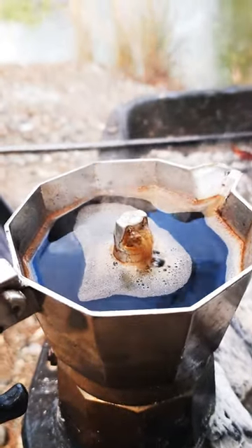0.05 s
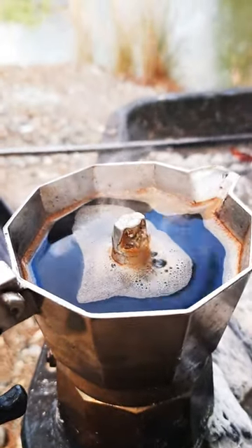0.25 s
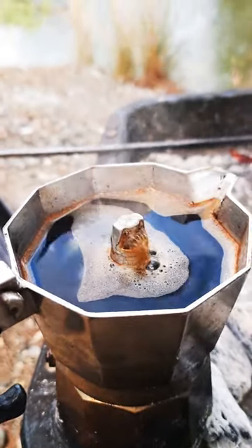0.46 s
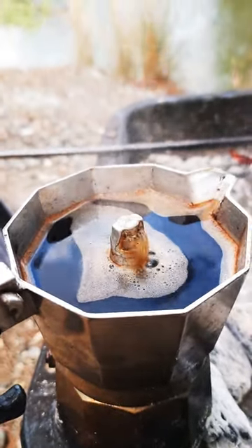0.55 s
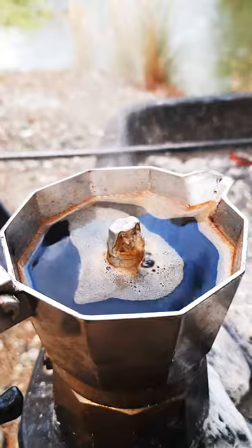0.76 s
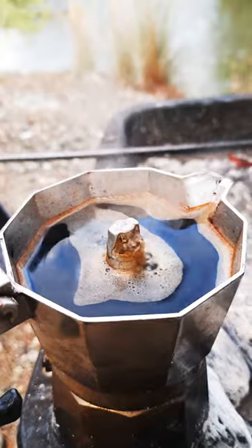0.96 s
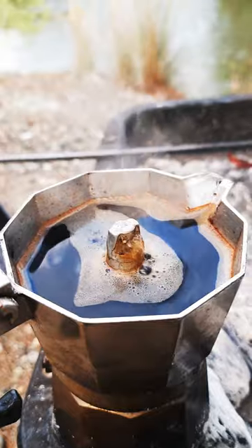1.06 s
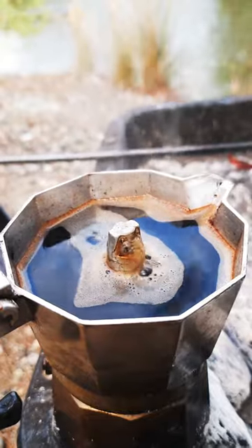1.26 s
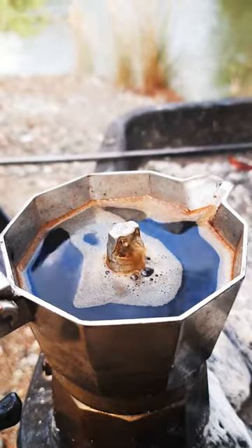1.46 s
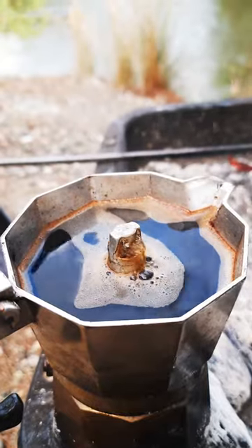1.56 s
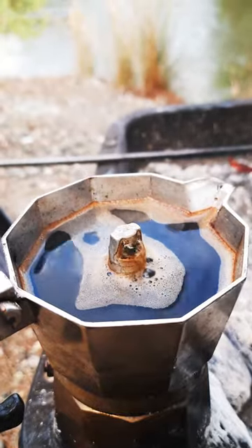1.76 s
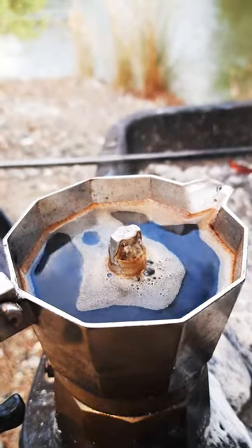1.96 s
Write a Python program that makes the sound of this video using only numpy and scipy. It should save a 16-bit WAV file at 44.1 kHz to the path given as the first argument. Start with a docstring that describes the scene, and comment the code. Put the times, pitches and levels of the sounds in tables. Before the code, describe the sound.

A light breeze rumbles on the microphone outdoors, giving a short fluttering thump early, then a few weaker bumps on the right. On the left, soft air hiss carries the faint sizzle of a steaming coffee pot.

```python
"""Outdoors in quiet air, beside a steaming coffee pot, with a stereo pair of microphones.
The left one hears a soft, even hiss, a distant low drone, the thin sizzle of steam and a few tiny
ticks of bursting foam. On the right, over a fainter hiss, a light breeze rumbles in the microphone
port; its eddies ring the port in a short fluttering thump with a dull pop, then a few weaker bumps."""
import sys
import numpy as np
from scipy import signal
from scipy.fft import rfft, irfft
from scipy.io import wavfile

SR = 44100
rng = np.random.default_rng(int(sys.argv[2]) if len(sys.argv) > 2 else 0)


def dump(signal):
    """Clip the signal to [-1, 1] and save it as 16-bit WAV at the path in sys.argv[1]."""
    limited = np.clip(np.atleast_2d(signal).T, -1, 1)
    pcm = np.round(limited * 32767).astype(np.int16)
    wavfile.write(sys.argv[1], SR, pcm)


N = 88200
FLICKER_PER_S = 14.4


def from_db(db):
    """Decibels to gain."""
    return 10 ** (np.asarray(db) / 20)


def in_time(rows):
    """A curve through rows of (seconds, value), at every sample."""
    return np.interp(np.arange(N) / SR, *np.transpose(rows))


def band_noise(low_hz, high_hz, order=2):
    """Steady band-passed noise with an rms of 1."""
    sos = signal.butter(order, [low_hz, min(high_hz, .48 * SR)], "band", fs=SR, output="sos")
    noise = signal.sosfilt(sos, rng.standard_normal(N + SR // 4))[-N:]
    return noise / noise.std()


def hiss(spectrum):
    """Smooth noise with the given spectrum in dB per Hz."""
    hz, db = np.transpose(spectrum)
    bins_hz = np.maximum(np.arange(N // 2 + 1) * SR / N, 1)
    gain = from_db(np.interp(np.log(bins_hz), np.log(hz), db)) * np.sqrt(SR / 2)
    return irfft(rfft(rng.standard_normal(N)) * gain, N)


def drift(rate):
    """A slow random wander with a spread of 1."""
    hop = 40  # samples between random steps
    pole = np.exp(-2 * np.pi * rate * hop / SR)
    steps = rng.standard_normal(N // hop + 2002)
    slow = signal.lfilter([1], [1, -2 * pole, pole * pole], steps)[2000:]
    return np.interp(np.arange(N) / hop, np.arange(len(slow)), slow / slow.std())


def ring(push, hz, t60):
    """A resonance: a unit push starts a dying oscillation at height 1."""
    pole = from_db(-60 / (t60 * SR))
    turn = pole * np.cos(2 * np.pi * hz / SR)
    return signal.lfilter([1, -turn], [1, -2 * turn, pole * pole], push + 1e-18)


def burst(start_s, rise_s, decay_s):
    """A straight rise and an exponential fall."""
    t = np.arange(N) / SR - start_s
    return np.clip(t / rise_s, 0, 1) * np.exp(-np.maximum(t - rise_s, 0) / decay_s)


# Open air at the left microphone. Each row: frequency in Hz, level before the swell in dB per Hz.
AIR_SPECTRUM = [(20,-105),(50,-86),(100,-84.5),(180,-86.5),(300,-89),(500,-88.5),(850,-92),(1020,-95.5),(1160,-93),(1300,-91.5),(1450,-99),(1600,-94.5),(1750,-100),(3000,-102.9),(4000,-107.3),(5400,-109.4),(6000,-111.8),(8300,-112.3),(8950,-118),(9200,-127),(9700,-127.5),(10300,-122),(15500,-122.7)]
# The swell of that hiss. Each row: time in seconds, gain in dB.
AIR_GAIN = [(0, 2.3), (.1, -0.3), (.2, 0.1), (.29, 2.5), (.4, 0.3), (.5, -0.3), (.62, -0.54), (.83, 0),
            (.95, -0.2), (1.17, 0.16), (1.35, 0), (1.42, -0.7), (1.55, 2), (1.64, -0.5), (1.71, -0.6),
            (1.78, .5), (1.87, 1.5), (2, -1.5)]
# A drone far off, coming and going. Each row: time in seconds, level in dB.
FAR_DRONE_LEVEL = [(0, -60), (.6, -68), (.72, -55.5), (.9, -65), (1.08, -51.5), (1.33, -63), (1.57, -52),
                   (1.68, -61.5), (1.8, -56.5), (2, -79)]
def open_air(flicker_db=0.83, drone_hz=132.6, drone_width_hz=8.6):
    """Even outdoor hiss, flickering slightly, over a distant, wavering drone."""
    even_hiss = from_db(in_time(AIR_GAIN) + flicker_db * drift(FLICKER_PER_S)) * hiss(AIR_SPECTRUM)
    drone = band_noise(drone_hz - drone_width_hz / 2, drone_hz + drone_width_hz / 2)
    return even_hiss + from_db(in_time(FAR_DRONE_LEVEL)) * drone


# Air at the sheltered right microphone. Each row: frequency in Hz, level in dB per Hz.
SHELTERED_SPECTRUM = [(600, -116.1), (1000, -120.4), (2000, -124.1), (5000, -127.9), (9000, -128.7),
                      (11000, -124.1), (15500, -126.0)]
def sheltered_air():
    """A faint, steady hiss on the sheltered side."""
    return hiss(SHELTERED_SPECTRUM)


# Wind in the right port. Each row: frequency in Hz, level before the breeze's gain in dB per Hz.
RUMBLE_SPECTRUM = [(20, -82), (30, -84), (50, -55.5), (62, -55.5), (85, -67), (120, -66.5), (180, -88.5),
                   (260, -87), (360, -102), (500, -116)]
# Strength of the breeze at that port. Each row: time in seconds, gain in dB.
BREEZE_GAIN = [(0, -1.5), (.19, -12), (.27, 13), (.39, -1), (.55, -3.5), (.66, -7), (.73, -0.5),
               (.87, -0.5), (.94, -6.5), (1.05, 0), (1.23, -2.5), (1.34, -1), (1.4, -9.5), (1.47, -6),
               (1.6, -5), (1.71, -8.5), (1.88, -1), (2, -3.5)]
def breeze(flicker_db=2.5, bands=12):
    """Low turbulence in the port follows the strength of the wind; each band flickers on its own."""
    hz, db = np.transpose(RUMBLE_SPECTRUM)
    edges_hz = np.geomspace(hz[0], hz[-1] * 1.05, bands + 1)
    rumble = 0
    for low, high in zip(edges_hz, edges_hz[1:]):
        centre_db = np.interp(np.log(low * high) / 2, np.log(hz), db)
        level = np.sqrt(high - low) * from_db(centre_db + flicker_db * drift(FLICKER_PER_S))
        rumble = rumble + level * band_noise(low, high, order=3)
    return from_db(in_time(BREEZE_GAIN)) * rumble


# Steam from the pot, close by on the left. Each row: time in seconds, level in dB.
SIZZLE_LEVEL = [(0, -89), (.19, -79.5), (.3, -70.5), (.4, -72.5), (.5, -73.5), (.61, -81), (.82, -69.5),
                (.97, -78.5), (1.14, -74), (1.33, -74), (1.42, -73), (1.53, -75), (1.68, -79.5), (1.9, -74),
                (2, -73)]
# The colour of the steam. Each row: frequency in Hz, relative level in dB.
SIZZLE_COLOUR = [(1000, -20), (2000, 2.5), (3200, 0), (5300, -3.5), (6200, -7.5), (8400, -9), (9200, -41),
                 (15500, -33)]
def steam():
    """Steam leaves the pot with a thin sizzle that swells and sinks."""
    sizzle = hiss(SIZZLE_COLOUR)
    return from_db(in_time(SIZZLE_LEVEL)) * sizzle / sizzle.std()


# Gusts across the right port. Each row: start in seconds, peak level in dB, rise and decay in seconds.
PORT_GUSTS = [(.21, -70, 0.084, 0.1), (1.11, -88, .03, .08)]
# The colour of their rush. Each row: frequency in Hz, relative level in dB.
RUSH_COLOUR = [(200, -6), (500, 11), (1000, -1), (2000, -14), (5000, -24), (9000, -24), (15500, -25)]
def gusts():
    """Air rushes softly across the port, swelling and dying with each gust."""
    rush = hiss(RUSH_COLOUR)
    level = sum(from_db(db) * burst(start_s, rise_s, decay_s) for start_s, db, rise_s, decay_s in PORT_GUSTS)
    return level * rush / rush.std()


# Eddies striking the right port. Each row: centre time in seconds, spread of the push in milliseconds,
# boom pitch in Hz, then the gains of boom, thud and knock in dB.
PORT_EDDIES = [(0.2162, 0.63, 66, -48, -24, -18.5), (.233, 0.53, 66, -45, -30, -22.5),
               (0.2567, 0.67, 72.5, -21.5, -31, -29), (0.268, 2.6, 52.3, -20.5, -33, -42),
               (0.2933, 1.04, 57.8, -14, -12, -43), (0.306, 1.3, 60.5, -32, -40, -48),
               (0.3123, 0.55, 65.6, -49, -34, -33.5), (0.338, 0.51, 65.6, -46, -46, -24.5),
               (0.3607, 0.39, 66, -38, -56, -42), (0.418, 0.72, 66.5, -40, -48, -35),
               (0.467, 1, 59, -33, -29, -31), (0.717, 3.7, 65.6, -43, -50, -62),
               (0.890, 1.6, 61, -28.5, -37, -60), (1.123, 0.89, 77, -23.5, -45.5, -30),
               (1.135, 2.65, 65.7, -21.5, -27, -53), (1.182, 2.1, 56, -28.5, -39, -62),
               (1.439, 1.8, 54, -26, -48, -54), (1.669, 2.43, 64, -23.5, -44, -58)]
def eddies(thud_hz=119, knock_hz=260, low_cut_hz=13):
    """Each eddy's smooth push rings the port: a low boom of its own pitch, a round thud, a hollow knock."""
    t = np.arange(N) / SR
    port = np.zeros(N)
    for centre_s, spread_ms, boom_hz, boom_db, thud_db, knock_db in PORT_EDDIES:
        push = np.exp(-.5 * ((t - centre_s) * 1000 / spread_ms) ** 2)
        push /= push.sum()
        port += from_db(boom_db) * ring(push, boom_hz, t60=0.086)
        port += from_db(thud_db) * ring(push, thud_hz, t60=0.031)
        port += from_db(knock_db) * ring(push, knock_hz, t60=0.031)
    return signal.sosfilt(signal.butter(2, low_cut_hz, "high", fs=SR, output="sos"), port)


def pop(start_s=.2905, band_hz=(355, 947)):
    """One dull snap of pressure at the port comes with the strongest eddy."""
    click = np.zeros(N)
    click[int(start_s * SR)] = 1
    return signal.sosfilt(signal.butter(5, band_hz, "band", fs=SR, output="sos"), click + 1e-18)


# Foam in the pot, close by on the left. Each row: start in seconds, level in dB, decay in seconds.
FOAM_TICKS = [(1.176, -67.5, 0.0034), (1.206, -60, 0.0016), (1.541, -72, 0.01)]
def foam():
    """Foam bubbles burst, each with a tiny bright tick."""
    level = sum(from_db(db) * burst(start_s, decay_s / 10, decay_s) for start_s, db, decay_s in FOAM_TICKS)
    return level * band_noise(low_hz=6800, high_hz=8400, order=3)


def scene():
    """Open air and the pot at the left microphone, wind at the right."""
    left = open_air() + steam() + foam()
    right = sheltered_air() + breeze() + gusts() + eddies() + pop()
    return np.array([left, right])


def record(dry):
    """The recorder cuts the top of both channels steeply."""
    cutoff_hz = 15750
    return signal.sosfilt(signal.ellip(12, .1, 80, cutoff_hz, fs=SR, output="sos"), dry)


dry = scene()
out = record(dry)
dump(out)
```